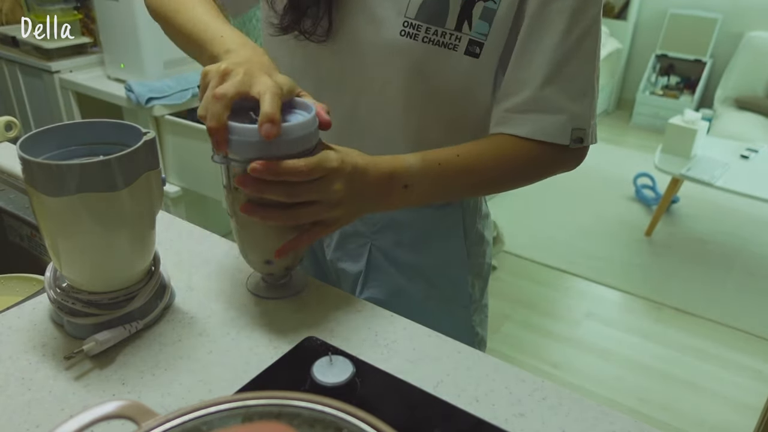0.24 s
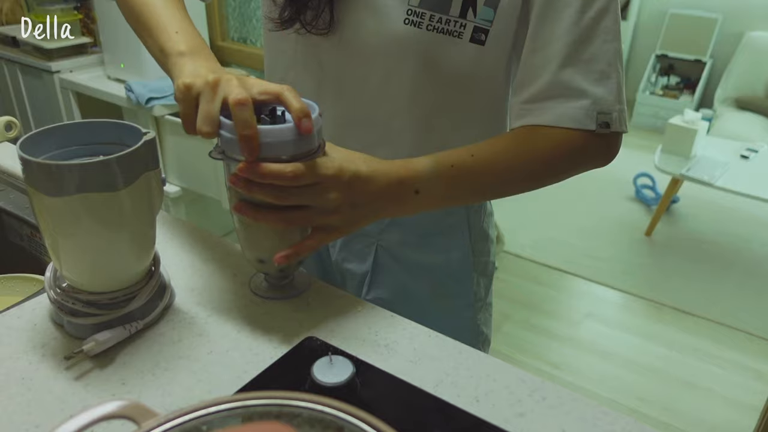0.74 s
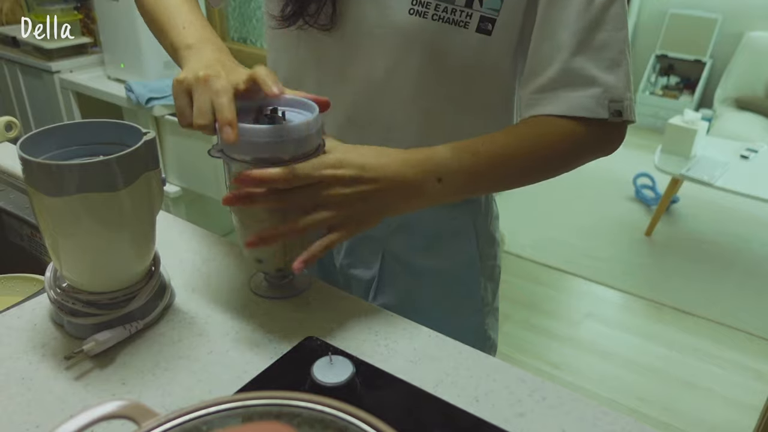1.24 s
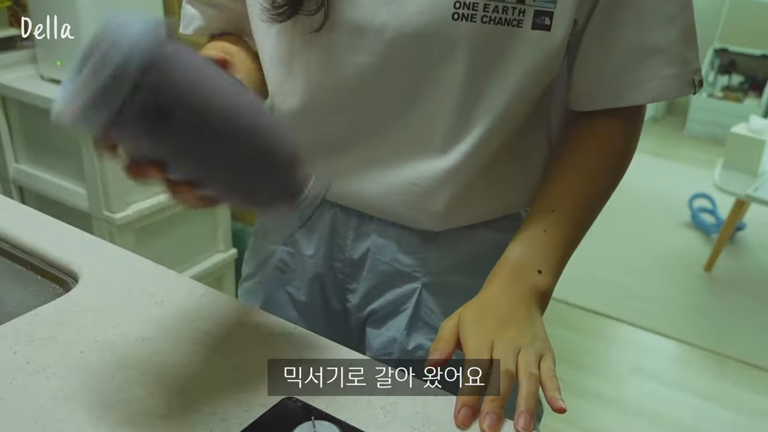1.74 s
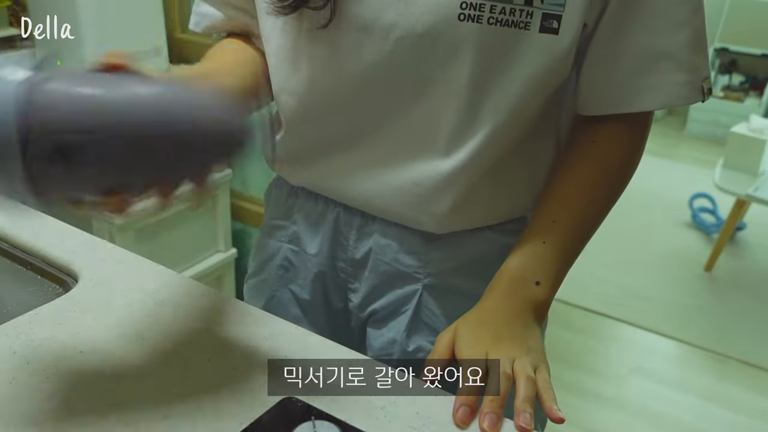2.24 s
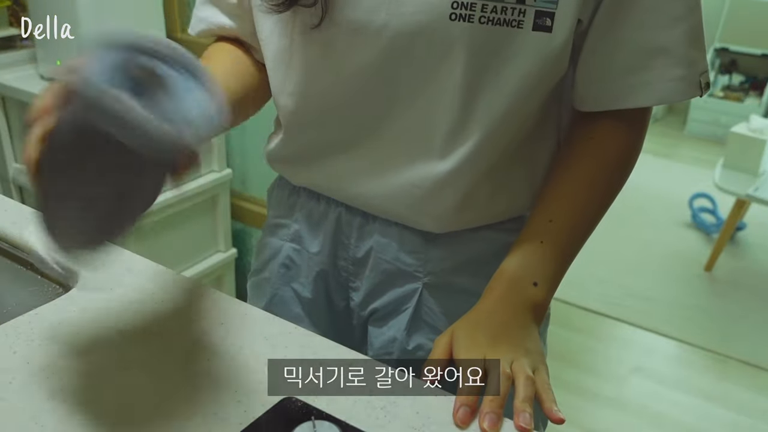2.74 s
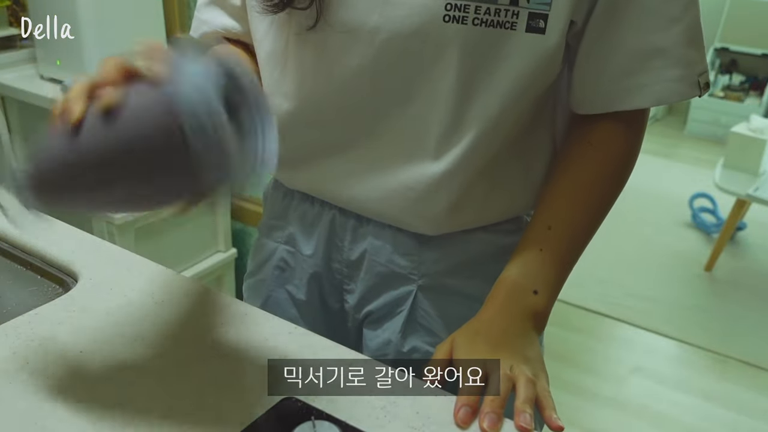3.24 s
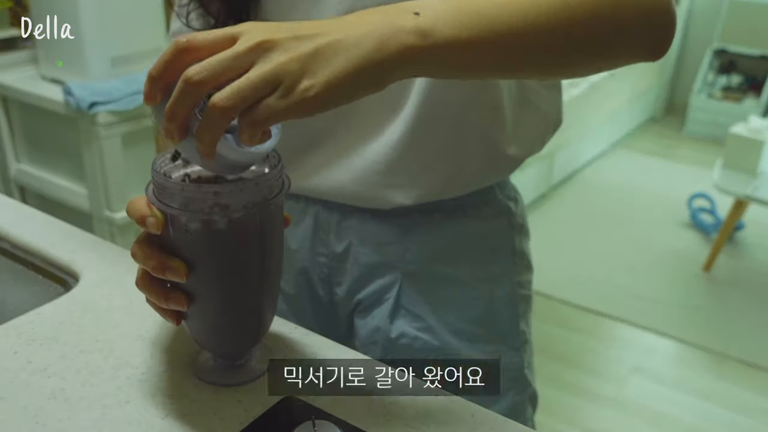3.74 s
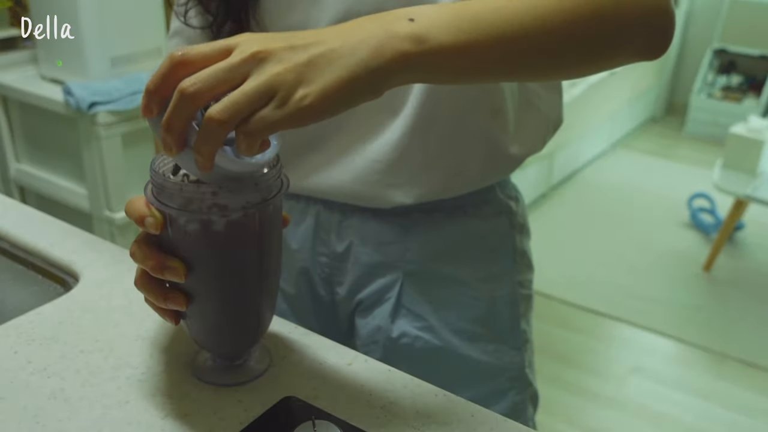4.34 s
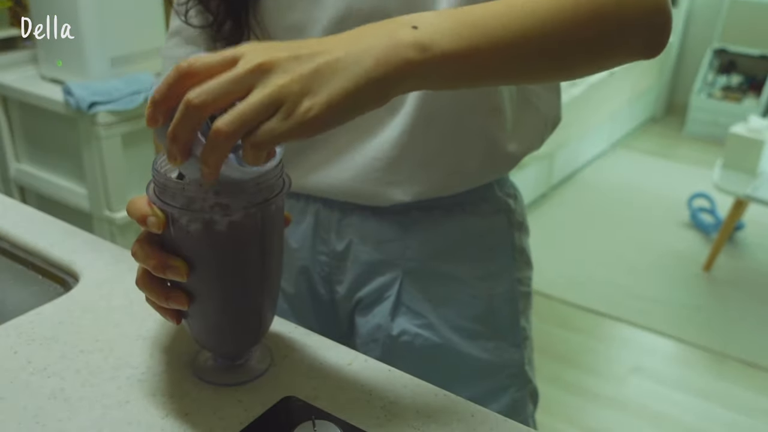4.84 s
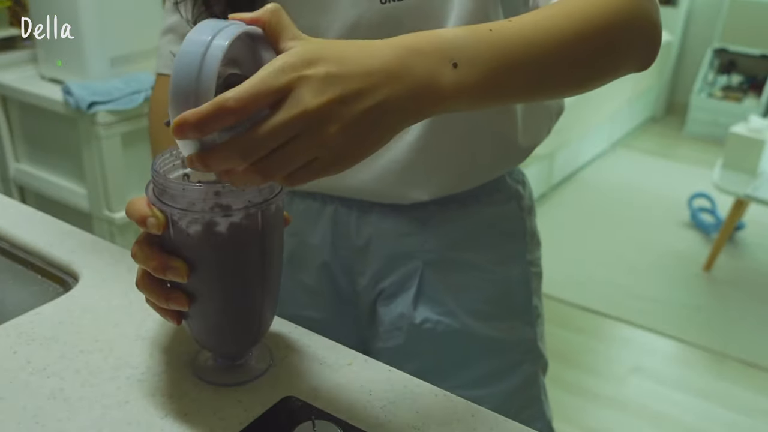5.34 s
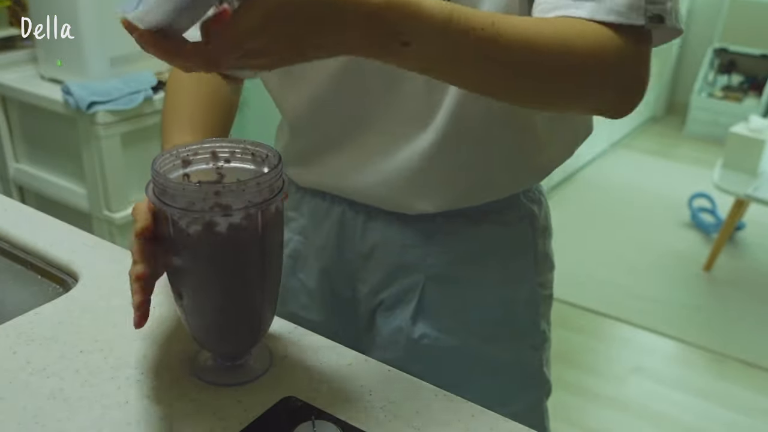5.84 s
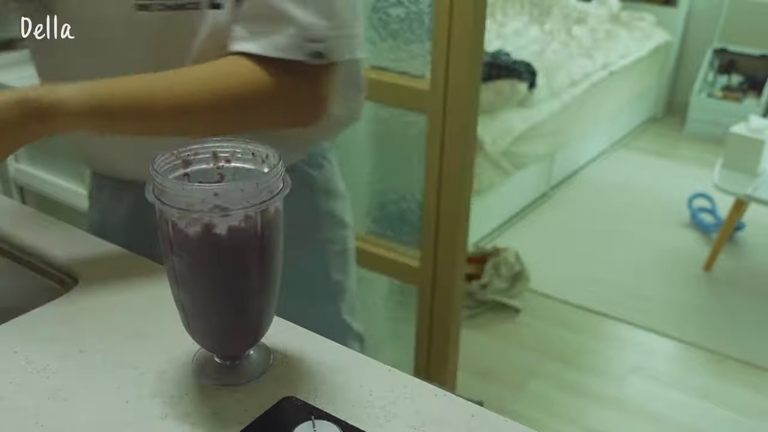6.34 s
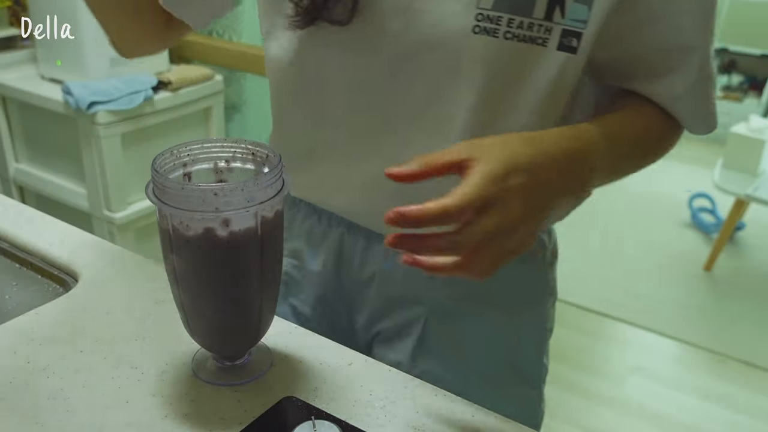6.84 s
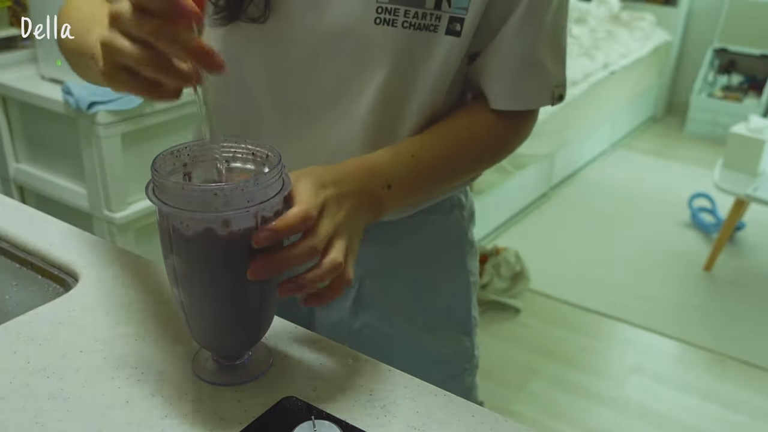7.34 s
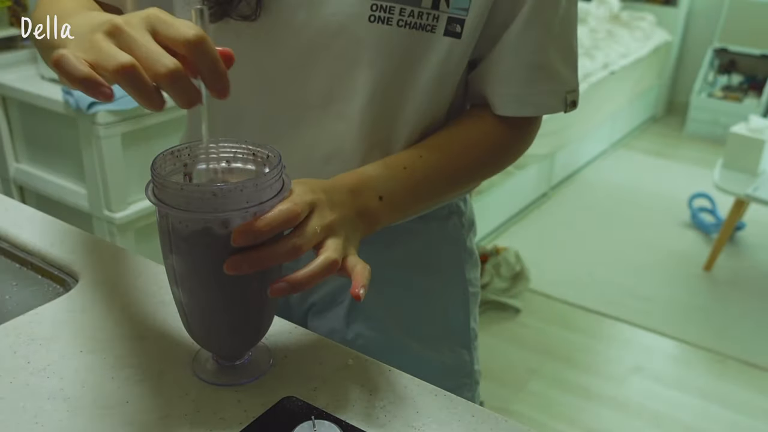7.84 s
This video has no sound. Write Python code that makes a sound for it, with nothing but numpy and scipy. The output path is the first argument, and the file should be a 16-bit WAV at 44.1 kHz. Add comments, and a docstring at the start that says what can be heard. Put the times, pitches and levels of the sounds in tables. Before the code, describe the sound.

Close up in a small kitchen with a soft fan, a plastic lid rubs, clicks and creaks tight on a blender cup. The cup is shaken, with dull gulps, bubbles and wet knocks. Then the lid is rapped about seven times on the rim, cracking and thumping into the counter. Light brushing and faint steel tinkles follow, and a glass straw knocks the cup's bottom.

```python
"""The lid of a smoothie-filled plastic blender cup is rapped on the rim: noise cracks and ringing modes.
Before that the thread creaks in stick-slip trains, and the shaken cup knocks, gulps and bubbles.
Afterwards cutlery tinkles in clusters of high modes and a glass straw drops to the bottom of the cup.
Grainy rubs follow the hand, a fan blows as coloured noise with faint tones, and a small room answers."""
import sys
import numpy as np
from scipy import signal
from scipy.fft import rfft, irfft
from scipy.io import wavfile

SR = 44100
rng = np.random.default_rng(int(sys.argv[2]) if len(sys.argv) > 2 else 0)


def unload_audio(sound):
    """Save the sound as a 16-bit wav file, at the path given as the first command line argument."""
    columns = np.transpose(np.atleast_2d(sound))
    # keep every value between -1 and 1, then stretch to whole-number steps
    steps = np.round(np.clip(columns, -1, 1) * 32767)
    wavfile.write(sys.argv[1], SR, steps.astype(np.int16))


N = 356328
TIME = np.arange(N) / SR
AGE = TIME[:SR // 2]   # time since a blow, s

# colour of the lid twisting on its thread: f/Hz, level per Hz/dB
TWIST_COLOUR = [(880, -53), (1500, -9), (1850, -9), (2230, 1), (3120, -13), (3840, -1), (4550, -6.5),
                (9470, -6.5), (10800, -11), (14800, -17), (16000, -28)]


def from_db(db):
    """Decibels to gain."""
    return 10 ** (np.asarray(db) / 20)


def rms_one(x):
    """Scale to unit rms."""
    return x / np.sqrt(np.mean(x ** 2) + 1e-20)


def at_hz(points, hz):
    """Read a table along log frequency."""
    f, value = np.transpose(points)
    return np.interp(np.log(np.maximum(hz, 1)), np.log(f), value)


def dying(t60):
    """Exponential decay from one, falling 60 dB in t60 seconds."""
    return from_db(-60 * AGE / max(t60, 1e-3))


def add(out, s, sound):
    """Mix a sound in at time s."""
    start = max(round(s * SR), 0)
    out[start:start + len(sound)] += sound[:N - start]


def colour(x, spectrum):
    """Causal (minimum-phase) filter with the shape of the given spectrum and unit power gain."""
    size = 8192
    gain = rms_one(from_db(at_hz(spectrum, np.fft.rfftfreq(size, 1 / SR))))
    # folding the cepstrum onto positive time makes the phase minimal
    cepstrum = irfft(np.log(gain))
    cepstrum[1:size // 2] *= 2
    cepstrum[size // 2 + 1:] = 0
    impulse = irfft(np.exp(rfft(cepstrum)))
    return signal.fftconvolve(x, impulse)[:len(x)]


def passband(x, hz, kind, order=2):
    """Butterworth filter."""
    return signal.sosfilt(signal.butter(order, hz, kind, fs=SR, output="sos"), x)


def drift(rate):
    """Random curve through normal knots, rate of them a second."""
    knots = rng.standard_normal(int(N / SR * rate) + 2)
    return np.interp(TIME * rate, np.arange(len(knots)), knots)


def hiss():
    """White noise as long as one blow."""
    return rng.standard_normal(len(AGE))


def ring(modes, spread_db, detune, scatter):
    """One blow: strength, pitch and phase of each mode vary with the grip and the point of contact."""
    chance = rng.standard_normal((len(modes), 3))
    out = 0
    for (hz, db, t60), (a, b, c) in zip(modes, chance):
        phase = 2 * np.pi * hz * (1 + detune * b) * AGE + scatter * c
        out = out + from_db(db + spread_db * a) * np.cos(phase) * dying(t60)
    return out


def crack(snap_t60, shell_db, shell_t60):
    """Envelope of a hard contact: a sharp snap, then crowded shell modes dying away."""
    return (dying(snap_t60) + from_db(shell_db) * dying(shell_t60)) / 2


def crunch():
    """Noise of a hard contact, broken up by tiny rebounds."""
    rate, depth_db = 900, 2.5   # knots per second, dB
    knots = rng.standard_normal(int(AGE[-1] * rate) + 2)
    chatter = np.interp(AGE * rate, np.arange(len(knots)), np.clip(knots, -2, 2))
    return rms_one(hiss() * from_db(depth_db * chatter))


def strokes(rows, attack_s, sag_db_per_s, release_s):
    """Gain of hand strokes: each sets in, sags while it lasts and dies away."""
    out = np.zeros(N)
    for s, length, db in rows:
        age = np.maximum(TIME - s, 0)
        attack = 1 - np.exp(-age / attack_s)
        release = np.exp(-np.maximum(age - length, 0) / release_s)
        out += from_db(db - sag_db_per_s * age) * attack * release
    return out


def rub(gain, spectrum, grains_per_s, grain_db):
    """Sliding surfaces: dense tiny catches of uneven size."""
    catches = rng.random(N) < grains_per_s / SR
    sizes = from_db(grain_db * rng.standard_normal(N))
    grains = catches * rng.choice([-1, 1], N) * sizes
    return colour(rms_one(grains) * gain, spectrum)


def fan():
    """Soft air noise with two duct resonances and faint tones; the sides differ most in the treble."""
    # spectrum of the air: f/Hz, level per Hz/dB
    air = [(25, -35), (45, -40), (70, -11.5), (115, -13), (140, -6), (240, -3.5), (295, -5), (430, -7.5),
           (600, -14), (950, -18), (2300, -19), (3200, -23.5), (5200, -28.5), (6600, -26), (10000, -31.5),
           (16000, -41.5)]
    # duct resonances: f/Hz, width/Hz, level/dB
    duct_modes = [(220.4, 63, -52), (391, 88, -50)]
    # faint tones: f/Hz, level/dB
    tones = [(143, -55), (772, -67.5), (5930, -74)]
    air_db = -46.5
    mid, side = (from_db(air_db) * colour(rng.standard_normal(N), air) for _ in range(2))
    for hz, width, db in duct_modes:
        edges = [max(hz - width / 2, 20), hz + width / 2]
        mid = mid + from_db(db) * rms_one(passband(rng.standard_normal(N), edges, "band"))
    for hz, db in tones:
        wander = 0.79 * drift(4.6)   # phase, radians
        mid = mid + from_db(db) * np.sqrt(2) * np.sin(2 * np.pi * hz * TIME + wander)
    side = from_db(-12.5) * side + from_db(-14.5) * passband(side, 340, "high", order=1)
    return mid + side * [[1], [-1]]


def kitchen(x):
    """Diffuse reflections that die band by band, much alike at the two close microphones."""
    # decay: f/Hz, t60/s
    room_t60 = [(100, 0.15), (500, 0.26), (2000, 0.28), (6000, 0.22), (15000, 0.19)]
    # strength of the reflections: f/Hz, level/dB
    room_send = [(100, -22.5), (400, -10), (1200, -6.5), (6000, -7), (15000, -4.5)]
    edges, tails = np.geomspace(80, 17000, 12), []
    for _ in range(2):
        tail = 0
        for low, high in zip(edges, edges[1:]):
            hz = np.sqrt(low * high)
            band = passband(hiss(), [low, high], "band") * dying(at_hz(room_t60, hz)) * (1 - dying(0.00078))
            share = np.sqrt(2 * (high - low) / SR)   # of the whole spectrum
            tail = tail + band / np.linalg.norm(band) * share * from_db(at_hz(room_send, hz))
        tails.append(signal.fftconvolve(x, tail)[:N])
    return tails[0] + from_db(-11.0) * tails[1] * [[1], [-1]]


def cutlery():
    """Small steel pieces ring in clusters of high modes along with a faint tick."""
    # touches: t/s, ring level/dB, f/Hz, cluster width/Hz, t60/s, tick level/dB
    touches = [(6.097, -40, 6940, 2000, .05, -62), (6.535, -39, 8170, 200, 0.26, -37.5),
               (6.536, -47, 12840, 220, 0.16, -37), (6.646, -43, 10000, 1400, 0.091, -47),
               (6.930, -38.5, 6560, 700, 0.14, -59), (6.931, -42, 5300, 1300, .08, -60),
               (6.931, -47, 13000, 3500, .09, -62), (6.950, -44, 12400, 1800, .08, -62)]
    out = np.zeros(N)
    for s, ring_db, hz, width, t60, tick_db in touches:
        cluster = rms_one(passband(hiss(), [hz - width / 2, hz + width / 2], "band")) * dying(t60) / 2
        tick = passband(hiss(), [1800, 8000], "band", order=1) * dying(0.2)
        add(out, s, from_db(ring_db) * cluster + from_db(tick_db) * tick)
    return out


def straw():
    """The glass tip ticks on the bottom and the cup's base takes up the ring with a rough thud."""
    # straw meeting the bottom and skidding on: t/s, ring level/dB, crack level/dB, thud level/dB
    contacts = [(7.4887, -20.5, -14, -27), (7.4925, -36, -21, -27)]
    # straw and cup base: f/Hz, level/dB, t60/s
    modes = [(223, -9.5, 0.22), (420, -12, 0.14), (449.5, -2.5, 0.24), (552, -8.5, 0.19), (750, -25, 0.08),
             (1335, -5, 0.07), (1378, -2, 0.11), (1410, -3.5, 0.18), (1500, -13, .075), (1616, -10, 0.1),
             (1900, -15, .05), (2370, -11, .04), (3580, 3, 0.013)]
    # crack of the glass tip: f/Hz, level per Hz/dB
    crack_colour = [(300, -10), (700, -7), (1000, -7), (1400, -3), (2200, -5.5), (2900, -10), (3600, 2.5),
                    (4300, -7), (5500, -3), (7300, -9.5), (10500, -15), (16000, -31)]
    # crowded modes of the cup's foot and the drink: f/Hz, level per Hz/dB
    thud_colour = [(150, -9), (330, -4), (480, 1), (700, -8), (1000, -17), (1400, -6), (1700, -14),
                   (2300, -21), (5000, -51)]
    rings, cracks, thuds = np.zeros((3, N))
    swell = 1 - dying(0.0092)
    shape = crack(snap_t60=0.009, shell_db=-4.0, shell_t60=0.05)
    for s, ring_db, crack_db, thud_db in contacts:
        add(rings, s, from_db(ring_db) * ring(modes, spread_db=1.5, detune=0.005, scatter=0.93) * swell)
        add(cracks, s, from_db(crack_db) * crunch() * shape)
        add(thuds, s, from_db(thud_db) * crunch() * dying(0.19) * swell)
    mixed = rings + colour(cracks, crack_colour) + colour(thuds, thud_colour)
    return passband(mixed, 170, "high", order=3)


def brushing():
    """Short brushes of dense fine grains as the lid is gripped, lifted and carried off."""
    # brushes: t/s, length/s, level/dB
    brushes = [(.41, 0.044, -49), (5.14, 0.059, -48.5), (5.641, 0.018, -40.5), (5.69, 0.056, -42),
               (5.8, 0.14, -57.5)]
    # their colour: f/Hz, level per Hz/dB
    brush_colour = [(350, -33), (600, -0.5), (700, -10), (1010, -11.5), (1960, -13.5), (2610, -8),
                    (5500, -10), (16000, -29.5)]
    gain = strokes(brushes, attack_s=0.003, sag_db_per_s=20, release_s=0.029)
    return rub(gain, brush_colour, grains_per_s=6000, grain_db=1.5)


def twisting():
    """The lid slides on its thread, a rub of coarse sparse grains."""
    # slides: t/s, length/s, level/dB
    slides = [(0, 0.16, -46.5), (.145, 0.049, -44.5), (.29, 0.24, -57.5), (.62, 0.15, -55),
              (1.07, 0.28, -53)]
    gain = strokes(slides, attack_s=0.0012, sag_db_per_s=4, release_s=0.059)
    return rub(gain, TWIST_COLOUR, grains_per_s=2000, grain_db=2.0)


def snaps():
    """The thread and rim catch and let go with single clicks."""
    # catches: t/s, level/dB
    catches = [(0.145, -23.5), (.1970, -26), (0.2163, -31), (.2250, -26), (0.228, -36), (0.233, -21.5),
               (0.235, -38), (.378, -39.5), (0.676, -41), (.70, -44), (.751, -31.5), (.7580, -26.5),
               (1.231, -33), (1.287, -39), (4.991, -35.5), (5.100, -38), (5.271, -39)]
    out, shape = np.zeros(N), crack(snap_t60=0.0099, shell_db=-7.5, shell_t60=0.054)
    for s, db in catches:
        add(out, s, from_db(db + 3.5) * shape * hiss())
    return passband(colour(out, TWIST_COLOUR), 2600, "high")


def creak():
    """The thread sticks and slips in a slowing train over a scrape; each slip rings the lid, higher as it seats."""
    # pushes of the wrist: t/s, length/s, level/dB
    pushes = [(.755, 0.085, -28), (.835, 0.014, -39), (.835, 0.1, -32.5), (.966, 0.072, -31.5)]
    # lid ringing under each slip: f/Hz, level/dB, t60/s
    lid_modes = [(3910, -18, 0.013), (4300, -21.5, 0.009), (5400, -30, 0.0076), (7370, -28, 0.012)]
    # colour of grit and scrape: f/Hz, level per Hz/dB
    creak_colour = [(700, -26), (1300, -16.5), (2300, -2), (3100, -8.5), (3900, -4), (4600, -4.5),
                    (5700, 0.5), (6700, -8), (7400, -5), (8400, -8.5), (9500, -5.5), (11200, -10),
                    (14500, -11), (16000, -27)]
    # the slips slow down as the thread binds, and the lid rings less the slower they come
    first_per_s, bound_per_s, binding_s = 440, 120, .125
    grit_db, scrape_db, lid_db, lid_db_per_octave = -3.5, -7, 4.5, 4.5
    lid_slack, seats_at_s, seating_s = 0.1, .806, 0.011   # the lid rings flat by this share until it seats
    grit_top_hz, dulling_s = 8000, 0.41   # the slips lose their top as the thread binds

    age = np.maximum(TIME - pushes[0][0], 0)
    per_s = bound_per_s + (first_per_s - bound_per_s) * np.exp(-age / binding_s)
    effort = strokes(pushes, attack_s=0.012, sag_db_per_s=41, release_s=0.027)
    # a slip falls on each whole count of an uneven clock while the wrist pushes
    count = np.cumsum(per_s * from_db(.8 * drift(200))) / SR
    slips = np.flatnonzero((np.diff(np.floor(count), prepend=0) > 0) & (effort > effort.max() / 20))
    shape = crack(snap_t60=.004, shell_db=-18, shell_t60=.02)
    shape, tick = shape / np.linalg.norm(shape), hiss()
    grit, rings = np.zeros((2, N))
    for i in slips:
        # sparser slips are stronger
        strength = effort[i] * np.sqrt(SR / per_s[i]) * from_db(rng.standard_normal())
        ring_db = lid_db + lid_db_per_octave * np.log2(per_s[i] / first_per_s)
        pitch = 1 - lid_slack / (1 + np.exp((TIME[i] - seats_at_s) / seating_s))
        # each slip is partly the same tick and partly fresh grit
        add(grit, TIME[i], strength * from_db(grit_db) * shape * (.5 * tick + 0.62 * hiss()))
        modes = [(hz * pitch, db, t60) for hz, db, t60 in lid_modes]
        lid = ring(modes, spread_db=1.0, detune=0.018, scatter=1.0)
        add(rings, TIME[i], strength * from_db(ring_db) * lid)
    scrape = from_db(scrape_db) * effort * rng.standard_normal(N)
    rasp, bright = colour(grit + scrape, creak_colour), np.exp(-age / dulling_s)
    dull = passband(rasp, grit_top_hz, "low", order=1)
    return bright * rasp + (1 - bright) * dull + passband(rings, 3340, "high")


def slosh():
    """Small bubbles burst in the thick drink; each rings a few cycles and rises in pitch."""
    # drink slopping about, shaken twice and then stirred: t/s, length/s, level/dB
    swirls = [(1.85, .5, -52), (2.8, 0.62, -44.5), (7.54, 0.31, -46)]
    bubbles_per_s = 120
    births = TIME[rng.random(N) < bubbles_per_s / SR]
    out, age = np.zeros(N), AGE[:SR // 25]
    for birth, (size, strength) in zip(births, rng.random((len(births), 2))):
        # a larger draw of size makes a higher, softer bubble
        cycles = 450 * 2 ** (2.65 * size) * age
        bubble = np.sin(2 * np.pi * cycles * (1 + 0.01 * cycles)) * from_db(-60 * cycles / 22)
        add(out, birth, from_db(10 * strength ** 3 - 2.1 * size - 4.0) * bubble)
    return out * strokes(swirls, attack_s=0.036, sag_db_per_s=3, release_s=0.065)


def gulping():
    """The cup bumps in the hand and the drink gulps inside: dull sines that sink in pitch."""
    # gulps: t/s, level/dB, f/Hz
    gulps = [(.434, -26.5, 171), (.446, -26.5, 197), (.885, -32.5, 190), (1.248, -28, 227),
             (1.43, -35, 590), (1.897, -38, 630), (2.187, -39, 660), (2.241, -29.5, 213), (2.246, -27, 315),
             (2.886, -27, 425), (2.912, -36, 466), (3.181, -31, 390), (3.325, -39, 796), (3.3624, -25, 610),
             (3.365, -34, 870), (3.371, -29.5, 472), (3.765, -36, 126), (5.73, -36, 560), (7.855, -39, 560)]
    sag, sag_s, t60_cycles = .15, 0.022, 23.4   # share of pitch lost, time it takes, decay in cycles
    out = np.zeros(N)
    sinking = np.cumsum(1 - sag * (1 - np.exp(-AGE / sag_s))) / SR
    for s, db, hz in gulps:
        envelope = dying(t60_cycles / hz) - dying(0.0016)
        add(out, s, from_db(db) * np.sin(2 * np.pi * hz * sinking) * envelope)
    return passband(out, 74, "high")


def shaking():
    """Lumps knock and splash on the wet wall at a pitch set by the drink behind it."""
    # lumps tapping the wall: t/s, knock level/dB, knock f/Hz, splash level/dB
    lumps = [(1.755, -23.5, 1755, -24.5), (1.9795, -33, 2070, -47), (2.095, -42, 2400, -45),
             (2.343, -36.5, 1130, -54), (2.3425, -35, 2050, -52), (2.537, -45, 3300, -49),
             (2.6248, -36, 2450, -49), (2.746, -34, 1150, -54), (2.769, -44, 1190, -39),
             (2.886, -28, 1930, -35), (2.893, -32.5, 1490, -43), (3.06, -43, 2700, -44),
             (3.091, -37, 1700, -44), (3.116, -35, 1490, -40), (3.122, -27.5, 1940, -43),
             (3.128, -31.5, 1590, -46), (3.170, -35, 2000, -43), (3.1795, -12, 1930, -16),
             (3.3625, -28.5, 1040, -46), (3.366, -35, 2500, -48), (3.42, -38, 1900, -50),
             (3.4651, -32, 2280, -51), (3.615, -33, 2280, -31.5), (3.620, -34, 1450, -49),
             (3.732, -28, 2260, -37.5)]
    # wall loaded by the drink: multiple of the knock's pitch, level/dB, t60/s
    wall_modes = [(.62, -8, .008), (.86, -5.5, .009), (1, .5, .012), (1.18, -4.5, .009), (1.6, -11, 0.0054)]
    # splash against the wet wall: f/Hz, level per Hz/dB
    wet_wall = [(400, -15), (800, -5), (1200, 1), (2100, 4.5), (2900, -1), (3500, 3), (4400, 3.5),
                (5400, 4.5), (6200, -6), (7000, -6), (8300, -18), (16000, -33)]
    splashes, knocks = np.zeros((2, N))
    shape = crack(snap_t60=0.019, shell_db=-6.0, shell_t60=0.063) * (1 - dying(0.00085))
    for s, knock_db, hz, splash_db in lumps:
        modes = [(hz * multiple, db, t60) for multiple, db, t60 in wall_modes]
        knock = ring(modes, spread_db=1.5, detune=0.015, scatter=0.86) * (1 - dying(0.0021))
        add(knocks, s, from_db(knock_db) * knock)
        add(splashes, s, from_db(splash_db) * shape * crunch())
    return colour(splashes, wet_wall) + knocks


def clacks():
    """Each edge of the lid that lands cracks the plastic shell and briefly rings the hard rim."""
    # edges landing on the rim, mostly two to a rap: t/s, crack level/dB, rim ring level/dB
    landings = [(3.834, -13.5, -30), (3.8383, -20.5, -34), (4.0443, -12.5, -19), (4.0486, -23, -26),
                (4.2156, -11, -13), (4.223, -22, -29), (4.2622, -25, -28), (4.3868, -17, -23),
                (4.3919, -18, -19), (4.5554, -20, -17), (4.5572, -12.5, -12.5), (4.721, -19, -11.5),
                (4.725, -12.5, -5.5), (4.868, -17, -11), (4.8752, -13.5, -8.5), (5.007, -27.5, -24),
                (5.023, -27, -17), (5.2158, -36.5, -47)]
    # crack of the plastic shell: f/Hz, level per Hz/dB
    shell = [(380, -30), (650, -15), (839, -26), (998, -6), (1400, -11), (1900, -11), (2400, -10.5),
             (2770, -9.5), (3600, -9.5), (4150, -12.5), (4700, -8.5), (5250, -8), (5700, -12.5), (6180, -7),
             (7600, -14), (8600, -11), (9800, -15.5), (11000, -14.5), (13600, -23), (16000, -38)]
    # hard lid rim: f/Hz, level/dB, t60/s
    rim_modes = [(3220, -23, .014), (5380, -14, 0.023), (6120, -12.5, 0.032), (6800, -7.5, 0.021),
                 (7250, -9, 0.015), (9320, -14.5, 0.023)]
    cracks, rims = np.zeros((2, N))
    shape = crack(snap_t60=0.013, shell_db=-2, shell_t60=0.063) * (1 - dying(0.0021))
    for s, crack_db, rim_db in landings:
        add(cracks, s, from_db(crack_db) * shape * crunch())
        add(rims, s, from_db(rim_db) * ring(rim_modes, spread_db=2, detune=0.01, scatter=1.5))
    return from_db(3.5) * colour(cracks, shell) + rims


def raps():
    """Each rap thumps the filled cup into the counter and rings its wall; softer blows are duller."""
    # lid rapped on the rim; the grip decides which pitch of the base is favoured:
    # t/s, base level/dB, favoured f/Hz, wall level/dB
    blows = [(3.8348, -10, 310, -9), (4.0447, -10.5, 251, -7.5), (4.2159, -9, 279, -8.5),
             (4.2613, -18, 260, -17.5), (4.389, -9, 313, -8.5), (4.5573, -9, 140, -8),
             (4.7244, -4, 303, -8.5), (4.871, -8.5, 248, -11), (4.992, -28, 205, -34),
             (5.007, -19.5, 204, -22), (5.023, -20, 210, -23.5), (5.2158, -21, 213, -16)]
    # filled cup standing on the counter: f/Hz, level/dB, t60/s
    base_modes = [(114.7, -19, 0.53), (167, -19, 0.48), (209.3, -6.5, 0.19), (246.4, -8, 0.13),
                  (275.5, -8, 0.13), (308.3, -10.5, 0.15)]
    # cup wall and the hollow above the drink: f/Hz, level/dB, t60/s
    wall_ring = [(404, -19, 0.22), (447.6, -10.5, 0.16), (525, -11.5, 0.14), (548, -10, 0.17),
                 (600, -15.5, 0.11), (696, -22, 0.14), (761, -25.5, 0.15), (958, -21, 0.14),
                 (999, -25.5, 0.18), (1128, -27, 0.11), (1187, -22.5, 0.1), (1395, -33, 0.066)]
    # crowded modes of the counter: f/Hz, level per Hz/dB
    counter = [(40, -30), (90, -17.5), (200, -2), (300, 1.5), (380, -7.5), (540, 1), (750, -14.5),
               (1200, -16.5), (1800, -24), (5000, -48)]
    grip_db, grip_octaves = 6, 0.2   # lift of the favoured pitch and its width
    tilt_per_db, neutral_db = 0.7, -13.5   # dB per octave for each dB of blow above neutral
    thumps, thuds = np.zeros((2, N))
    swell = 1 - dying(0.011)   # the heavy cup takes a moment to get moving
    for s, base_db, grip_hz, wall_db in blows:
        base = []
        for hz, db, t60 in base_modes:
            lift_db = grip_db * np.exp(-(np.log2(hz / grip_hz) / grip_octaves) ** 2)
            base.append((hz, base_db + db + lift_db, t60))
        tilt_db = tilt_per_db * (wall_db - neutral_db)
        wall = [(hz, wall_db + db + tilt_db * np.log2(hz / 540), t60) for hz, db, t60 in wall_ring]
        base_sound = ring(base, spread_db=1.0, detune=0.0065, scatter=0.53)
        wall_sound = ring(wall, spread_db=1.5, detune=0.0082, scatter=0.74)
        add(thumps, s, swell * (base_sound - wall_sound))   # the two start in opposite directions
        add(thuds, s, from_db(wall_db - 9) * hiss() * dying(0.18))
    return passband(thumps, 113, "high", order=3) + colour(thuds, counter)


def scene():
    """Handling in the centre, its bounce off the counter, the room and the fan, a touch louder on the right."""
    handling = cutlery() + straw() + brushing() + twisting() + snaps() + creak()
    handling = handling + slosh() + gulping() + shaking() + clacks() + raps()
    # the counter top reflects the treble a little differently into each microphone
    late = np.interp(TIME - .0011, TIME, handling)
    bounce = from_db(-10.5) * passband(late, 1400, "high", order=1)
    mixed = handling + bounce * [[1], [-1]] + kitchen(handling) + fan()
    return mixed * from_db([[-.3], [.3]])


def record(dry):
    """The level dips once, creeps up and comes back; the highest peaks are rounded and the top is cut."""
    dip_at_s, dip_length_s, dip_edge_s = 1.641, 0.102, 0.0026
    dip_db, recovery_db_per_s = -26.5, 160
    level_db, peak_limit, cutoff_hz = -5.5, .75, 16200
    age = TIME - dip_at_s
    inside = np.clip(age / dip_edge_s, 0, 1) * np.clip(1 - (age - dip_length_s) / dip_edge_s, 0, 1)
    dipped = dry * from_db(level_db + inside * (dip_db + recovery_db_per_s * age))
    rounded = peak_limit * np.tanh(dipped / peak_limit)
    return signal.sosfilt(signal.ellip(10, .1, 80, cutoff_hz, fs=SR, output="sos"), rounded)


dry = scene()
out = record(dry)
unload_audio(out)
```